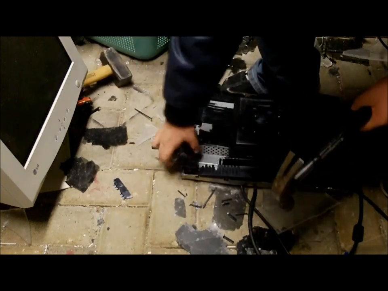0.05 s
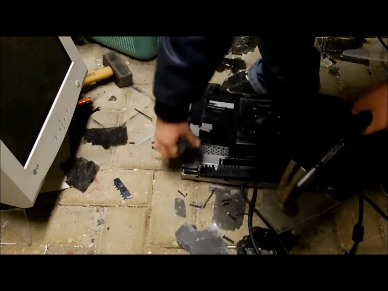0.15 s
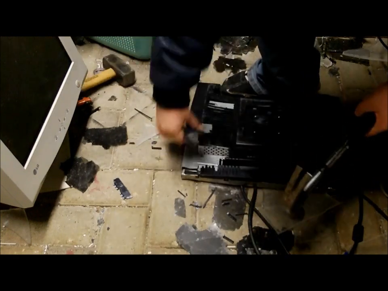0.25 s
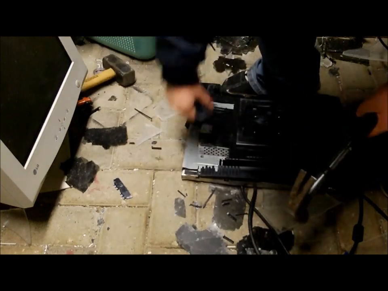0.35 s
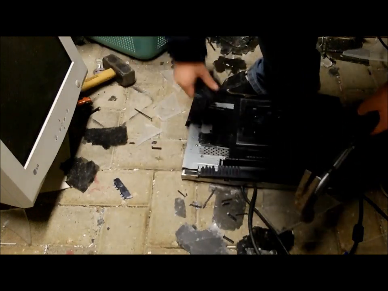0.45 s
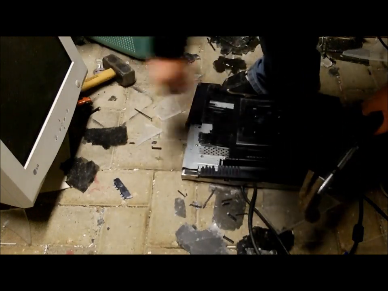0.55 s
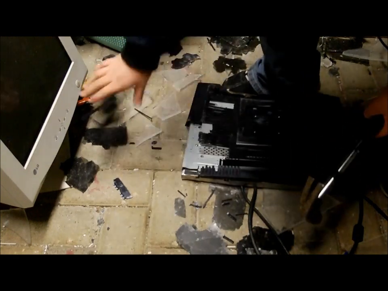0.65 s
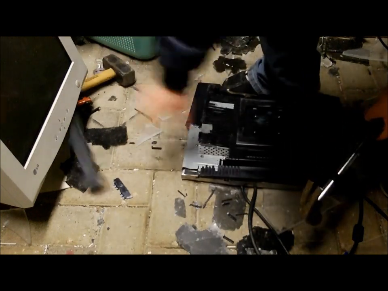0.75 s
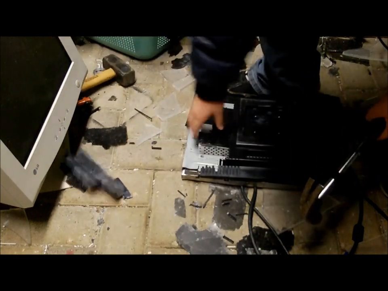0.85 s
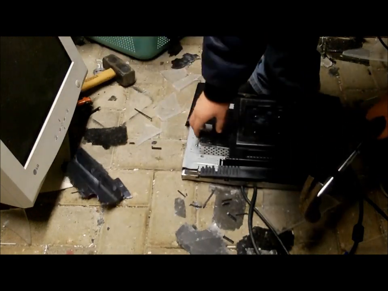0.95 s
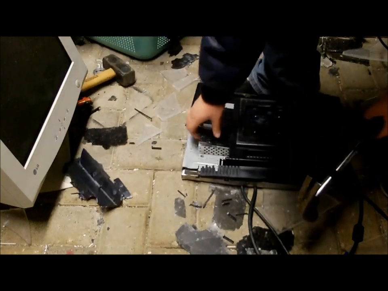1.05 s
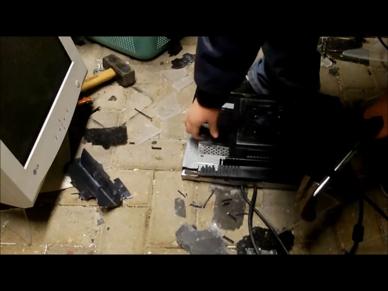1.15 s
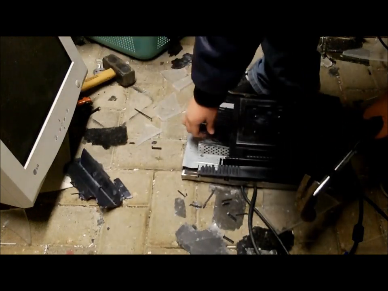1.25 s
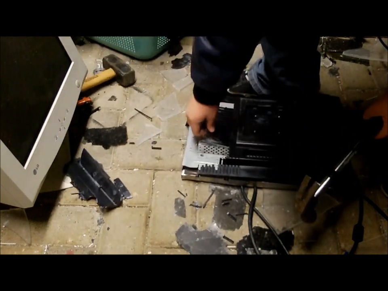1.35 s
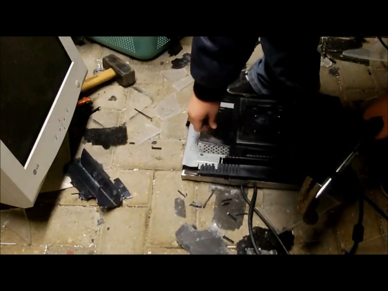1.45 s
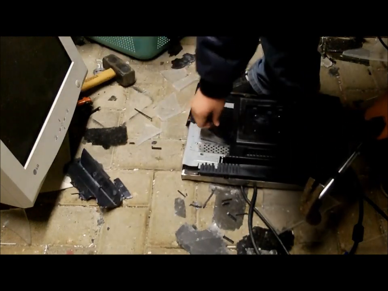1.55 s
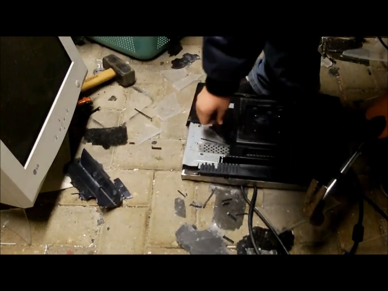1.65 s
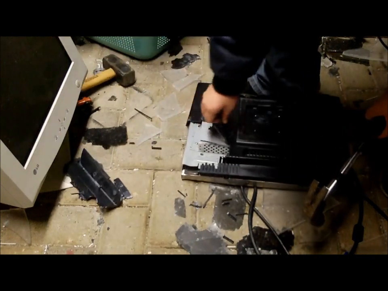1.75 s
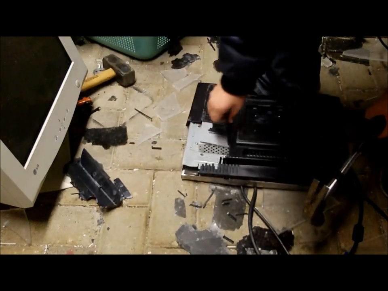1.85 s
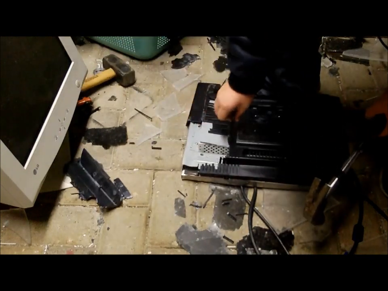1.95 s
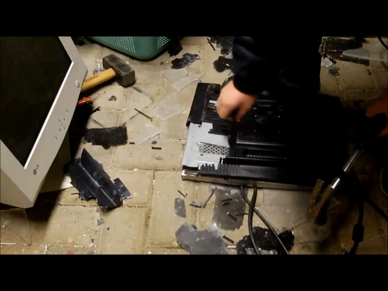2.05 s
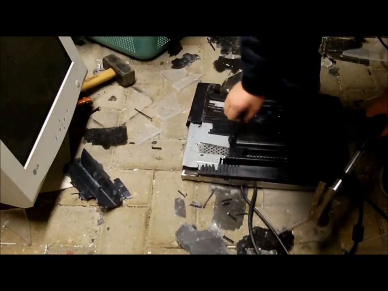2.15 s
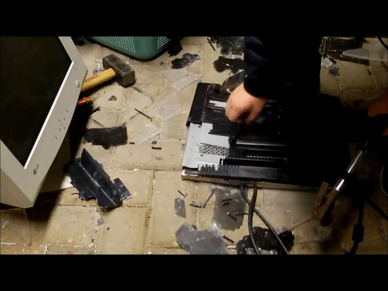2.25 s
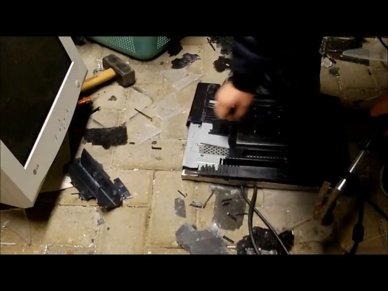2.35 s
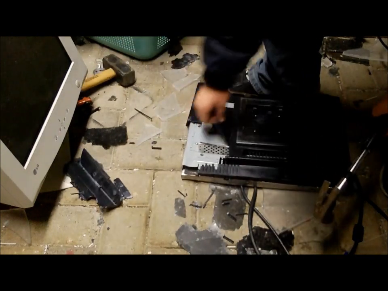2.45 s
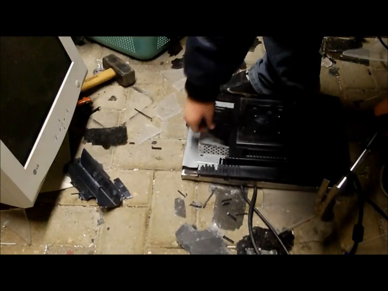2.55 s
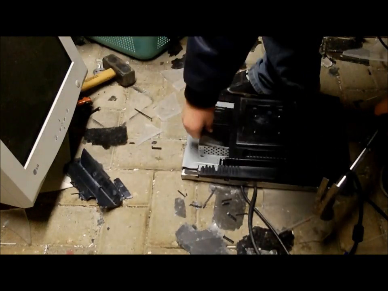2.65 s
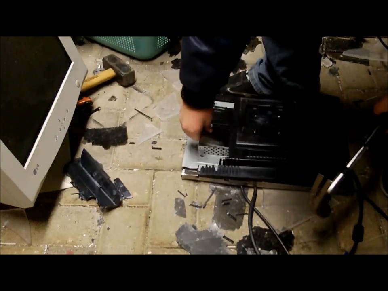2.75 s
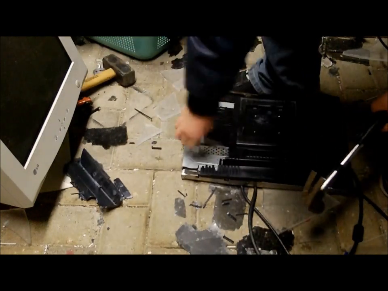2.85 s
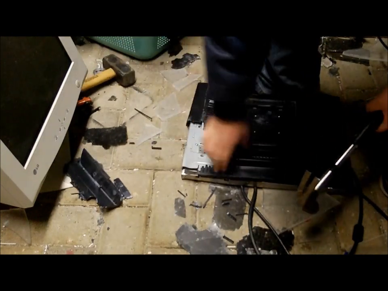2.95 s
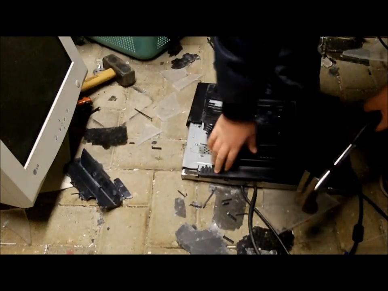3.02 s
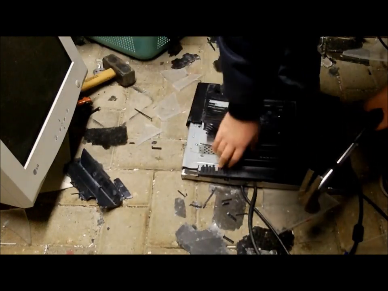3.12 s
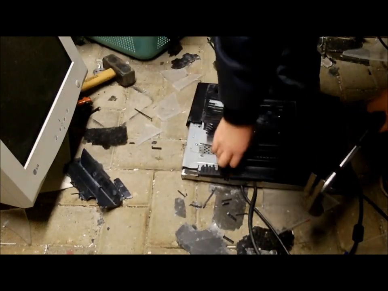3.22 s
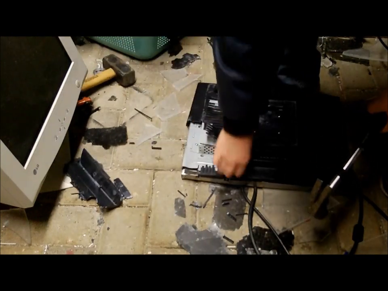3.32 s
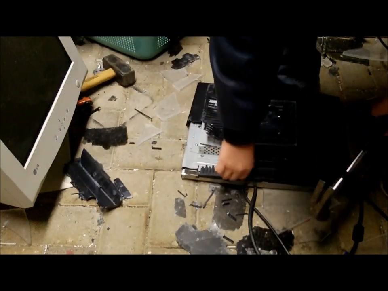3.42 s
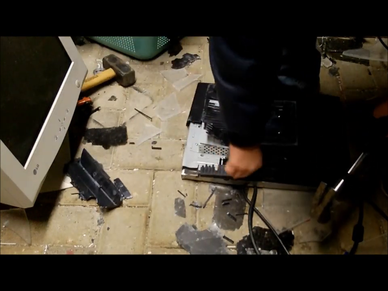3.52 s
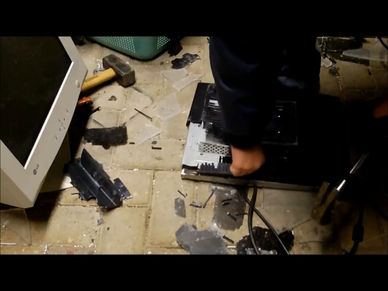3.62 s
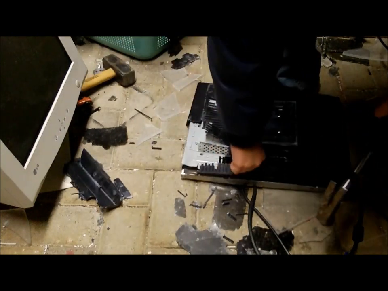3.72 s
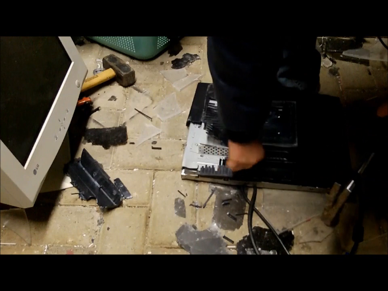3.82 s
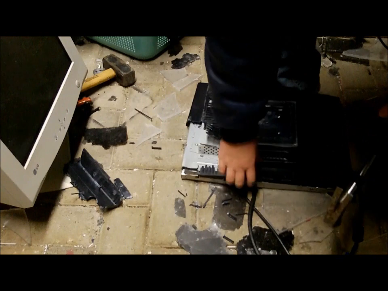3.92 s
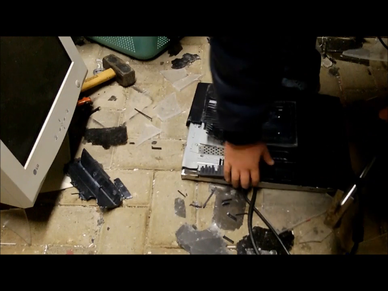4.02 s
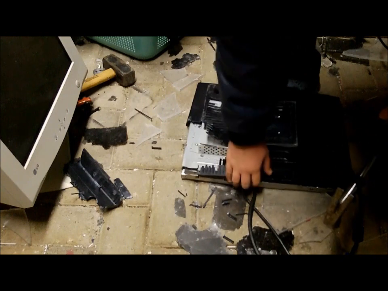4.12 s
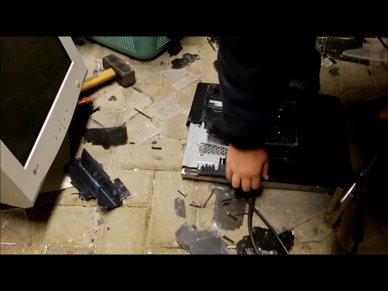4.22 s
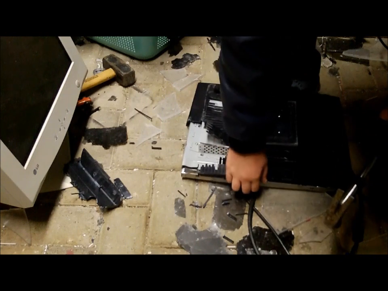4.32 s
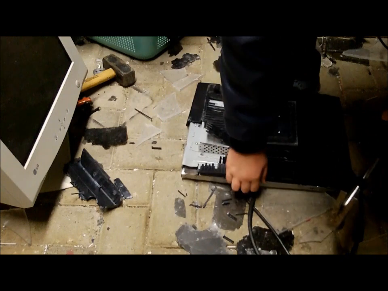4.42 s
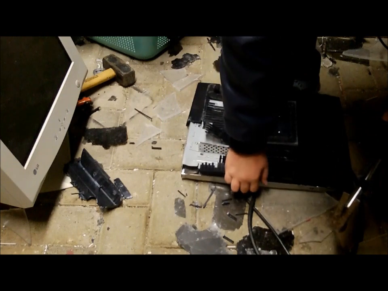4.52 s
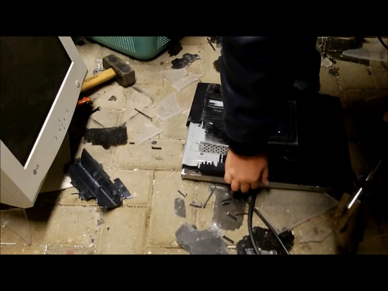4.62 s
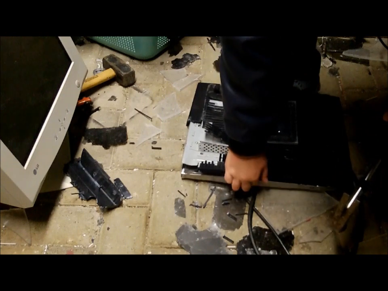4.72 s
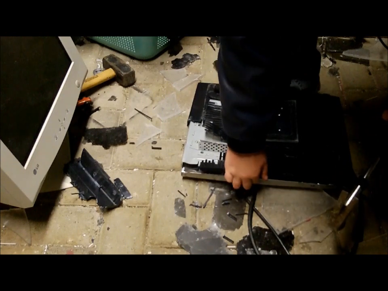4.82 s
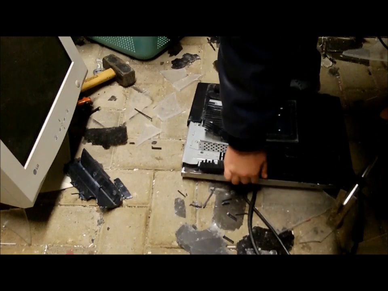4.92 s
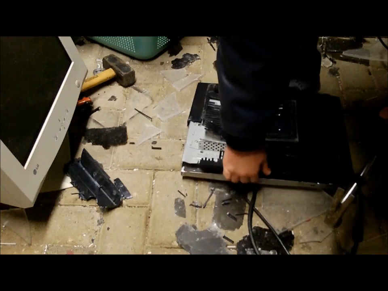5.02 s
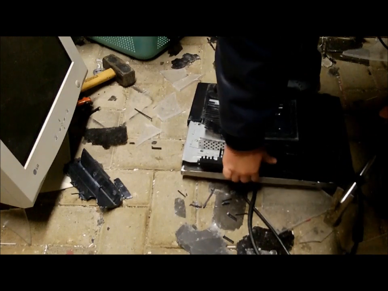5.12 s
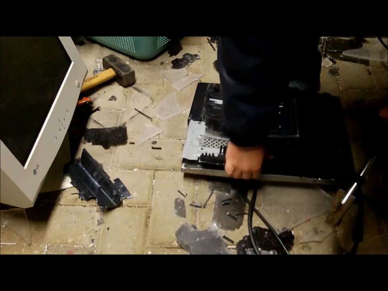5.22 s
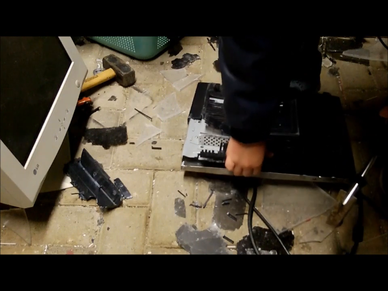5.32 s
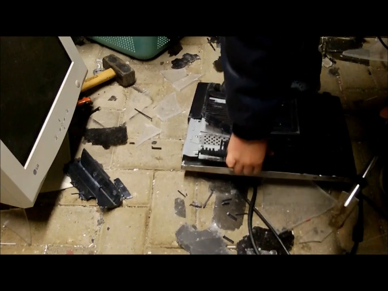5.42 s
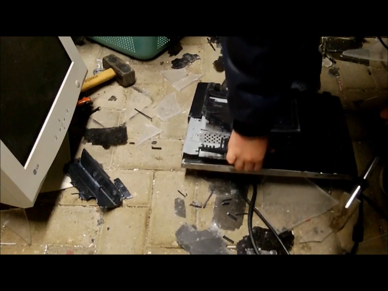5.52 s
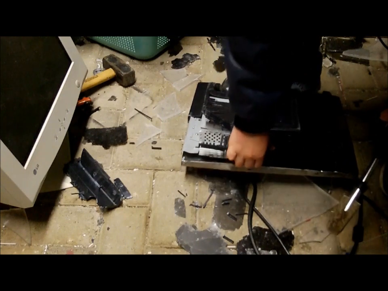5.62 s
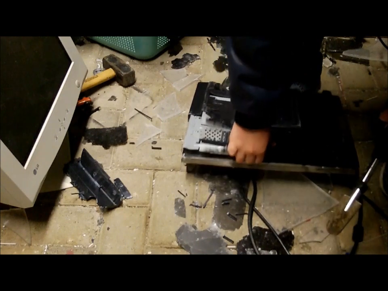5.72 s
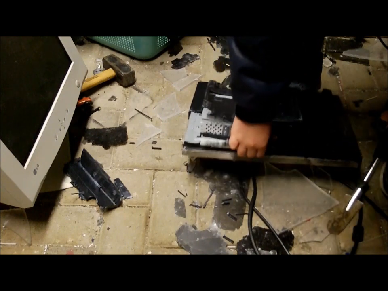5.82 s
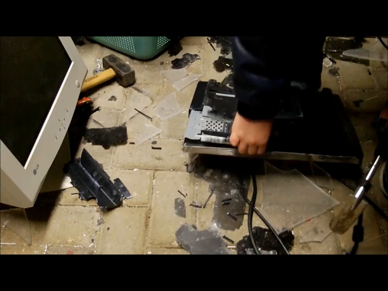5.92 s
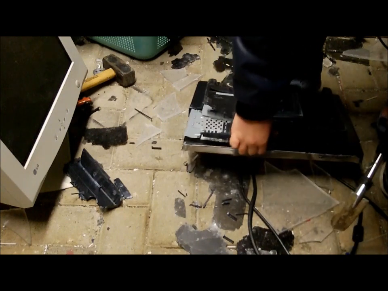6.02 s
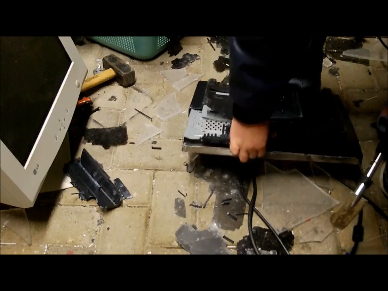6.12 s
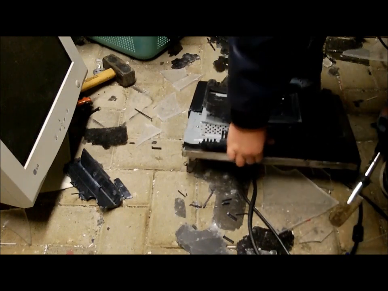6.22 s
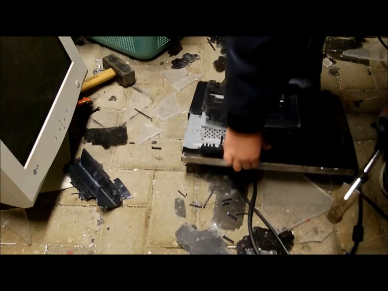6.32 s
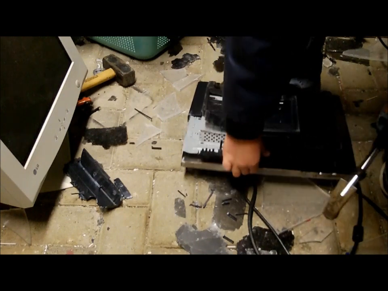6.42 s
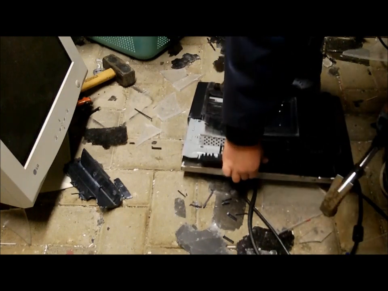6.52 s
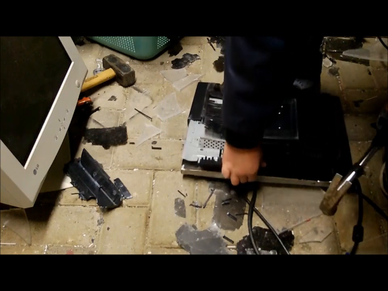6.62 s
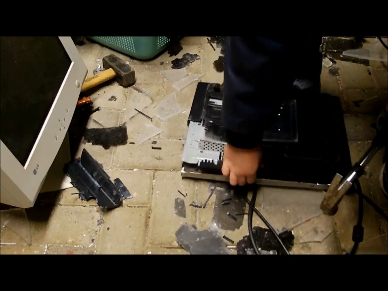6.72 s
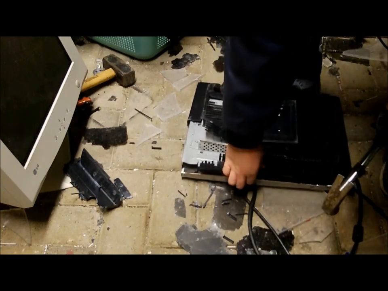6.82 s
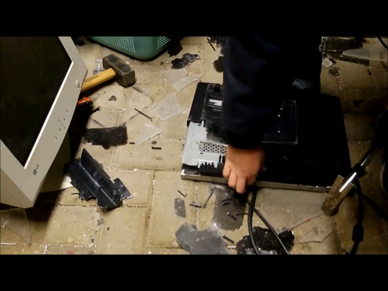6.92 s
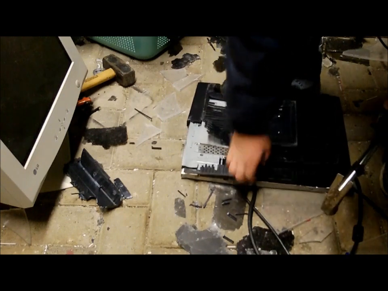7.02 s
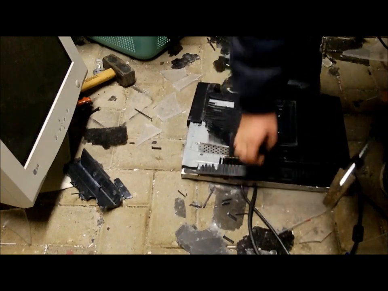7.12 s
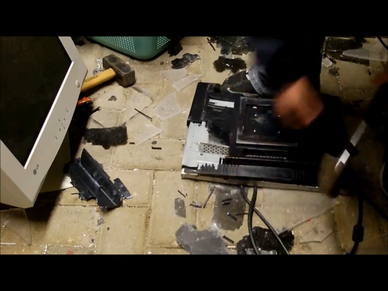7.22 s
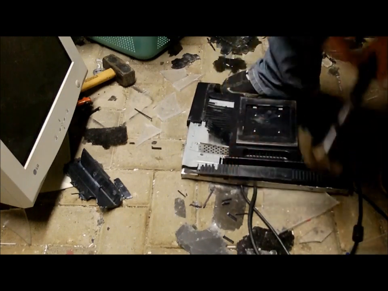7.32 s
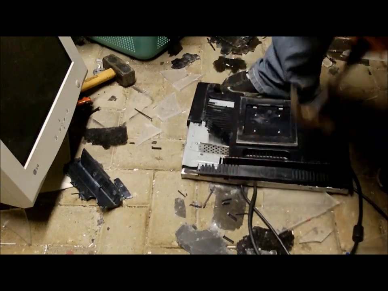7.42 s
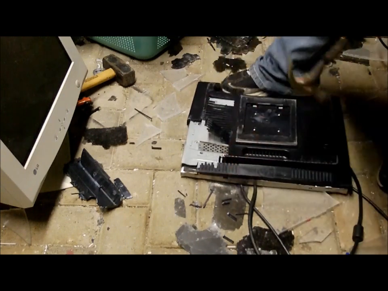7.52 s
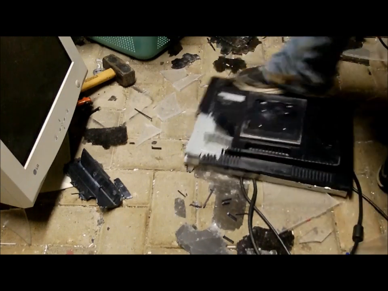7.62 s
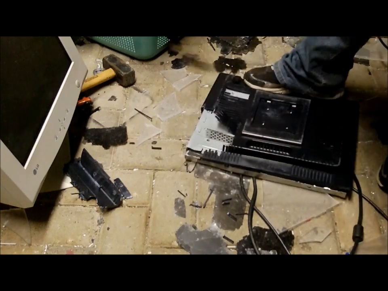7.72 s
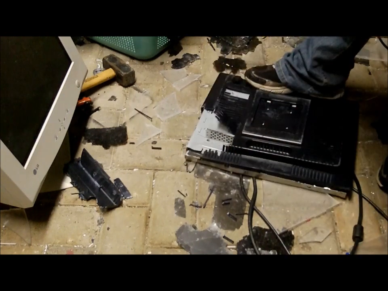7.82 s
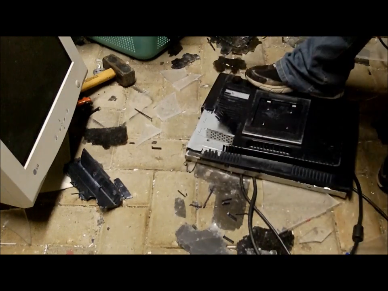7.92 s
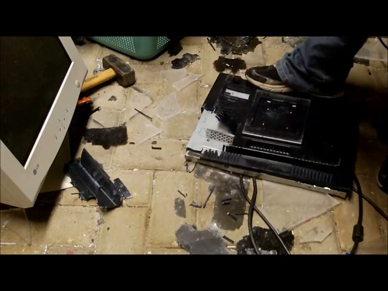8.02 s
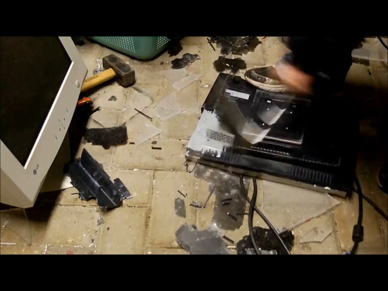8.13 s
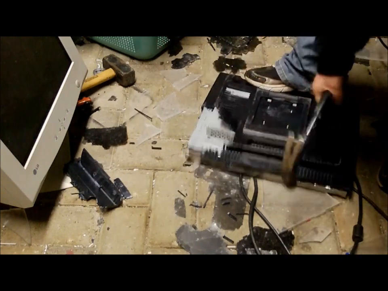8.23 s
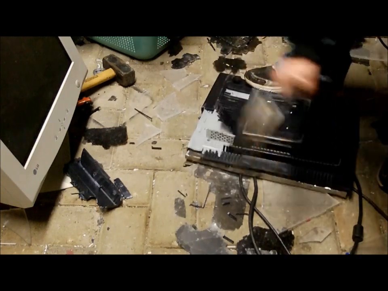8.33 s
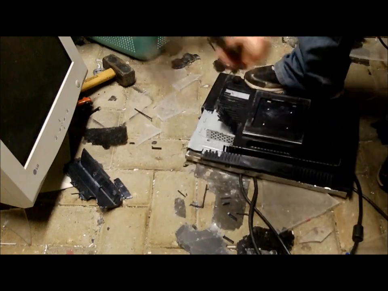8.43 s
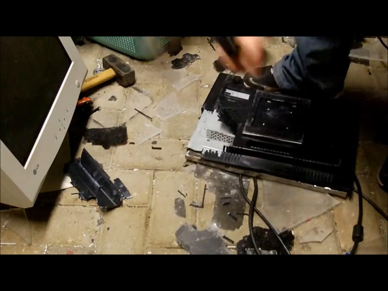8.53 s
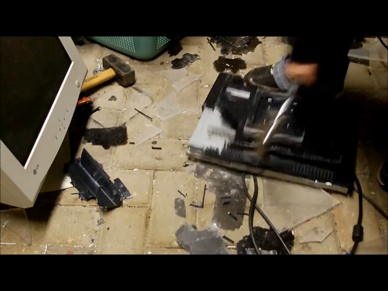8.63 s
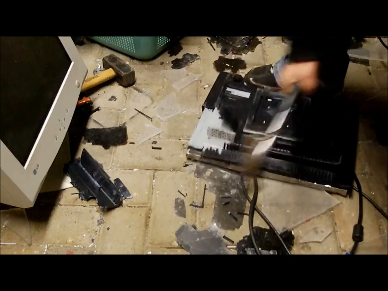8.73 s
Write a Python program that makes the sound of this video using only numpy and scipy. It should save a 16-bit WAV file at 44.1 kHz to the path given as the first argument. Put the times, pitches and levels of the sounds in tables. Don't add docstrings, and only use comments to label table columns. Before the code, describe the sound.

In a small hard-walled workshop, very close, plastic and metal are torn from a broken monitor with a sharp crunch, and scraps clatter and ring on tile. Two crisp plastic rips follow, then quiet ticks and crumbs, a panel crack, a loud frame drop, a rattling drag, and two shattering hammer blows. The microphone overloads on the loudest hits.

```python
import sys
import numpy as np
from scipy import signal
from scipy.fft import rfft, irfft, next_fast_len
from scipy.io import wavfile
from scipy.ndimage import uniform_filter1d

SR = 44100
rng = np.random.default_rng(int(sys.argv[2]) if len(sys.argv) > 2 else 0)


def file_out(sig):
    cols = np.atleast_2d(sig).T
    lim = np.clip(cols, -1, 1)
    pcm = np.round(lim * 32767).astype(np.int16)
    wavfile.write(sys.argv[1], SR, pcm)


def elevation(decibels):
    levels = np.asarray(decibels, float)
    return 10 ** (levels / 20)


N = 386316


def read(points, hz):
    f, value = np.transpose(points)
    return np.interp(np.log(hz + 1), np.log(f + 1), value)


def evened(x):
    return x / np.sqrt(np.mean(x ** 2) + 1e-20)


def coloured(x, gain):
    size = next_fast_len(x.shape[-1])
    spectrum = rfft(x, size) * gain(np.fft.rfftfreq(size, 1 / SR))
    return irfft(spectrum, size)[..., :x.shape[-1]]


def add(mix, start_s, sound):
    part = mix[..., max(round(start_s * SR), 0):][..., :sound.shape[-1]]
    part += sound[..., :part.shape[-1]]


def spell(start_s, length_s, db):
    edge_share = 0.13
    u = (np.arange(N) / SR - start_s) / length_s
    return elevation(db) * np.clip(np.minimum(u, 1 - u) / edge_share, 0, 1)


# f/Hz, level/dB
AIR = [(27, 3.5), (50, 1), (100, -8), (200, -17.5), (500, -17.5), (1000, -22.5), (2500, -28.5),
       (6000, -26.5), (10000, -26.5), (15000, -30.5)]
# t/s, length/s, level/dB
RUMBLE = [
    (4.202, 0.7, -40.5),
    (5.0, 1.67, -48),
]
# t/s, length/s, f/Hz, level/dB
HUM = [(4.6, .4, 132, -43.5), (4.65, .32, 200.6, -48.5), (5.015, 0.4, 199.6, -46), (5.5, 1.35, 200.6, -53),
       (5.2, .8, 145, -54), (4.26, 0.76, 312, -52.5), (6.0, .6, 307, -55.5), (6.75, .4, 303, -52),
       (7.7, 0.64, 305, -58)]


def air():
    air_db = -43.5
    drift = uniform_filter1d(uniform_filter1d(rng.standard_normal(N), 5000), 5000)
    hiss = evened(coloured(rng.standard_normal(N), lambda hz: elevation(read(AIR, hz))))
    tone = elevation(air_db) * elevation(2.0 * evened(drift)) * hiss
    rumble = evened(coloured(rng.standard_normal(N), lambda hz: hz / (1 + (hz / 70) ** 4)))
    tone += elevation(-4) * sum(spell(*row) for row in RUMBLE) * rumble
    machine_s = np.cumsum(1 + 0.013 * evened(uniform_filter1d(rng.standard_normal(N), 6000))) / SR
    for start_s, length_s, hz, db in HUM:
        tone += spell(start_s, length_s, db - 1.5) * np.sin(2 * np.pi * hz * machine_s)
    return tone


# f/Hz, t60/s
WALLS = [(100, 0.48), (500, 0.29), (2000, 0.37), (5000, 0.35), (12000, 0.28)]


def workshop(moving, still):
    count, spacing, turn_samples = 4, 10, 200
    taps = np.zeros((count, SR))
    slots = np.arange(60, SR - 10, spacing)
    at = slots + rng.integers(0, spacing, (count, len(slots)))
    np.put_along_axis(taps, at, rng.choice([-1., 1.], at.shape), 1)
    hz, t, z = signal.stft(taps, SR, nperseg=256)
    decay = elevation(-60 * t / read(WALLS, hz)[:, None])
    tails = signal.istft(z * decay, SR, nperseg=256)[1]
    tails = tails[:, :SR // 2] / np.linalg.norm(tails[0])
    which = np.arange(count)[:, None]
    turn = (np.arange(N) / turn_samples - which) % count - 1
    shares = np.cos(np.pi / 2 * np.clip(turn, -1, 1))
    sends = moving * shares + still * (which == 0)
    return signal.oaconvolve(sends, tails, axes=1).sum(0)[:N]


# f/Hz, level/dB
CRACK = [(30, -8), (120, -6.5), (300, -9), (600, 0), (2000, -6.5), (4500, -7.5), (7500, -6.5),
         (11000, -10.5), (16000, -26)]
SHADES = (650, 1900, 4500, 11500)


def shade_gains(hz):
    weights = [read(np.c_[SHADES, row], hz) for row in np.eye(len(SHADES))]
    gains = elevation(read(CRACK, hz)) * np.array(weights)
    return gains / np.sqrt(np.mean(gains ** 2, axis=1, keepdims=True))


def shades(x):
    return np.array([evened(part) for part in coloured(x, shade_gains)])


# f/Hz, width/Hz, level/dB
FRAME = [(400, 140, -0.5), (588, 32, -4.5), (663, 14, 5), (838, 28, 1.5), (1200, 85, -2.5), (1770, 200, -4),
         (2440, 37, -13.5)]
# t start/s, t peak/s, hold/s, level/dB, fall/(dB/s)
TUMBLES = [
    (.02, .32, 0.021, -9, 288),
    (.69, .7, .02, -12, 75.5),
]
FUMBLES = [
    (1.3, 1.45, .02, -43, 80),
    (4.2, 4.49, .6, -46.5, 300),
    (5.7, 5.9, 0.16, -44, 59.7),
]
DRAGS = [
    (6.97, 7.03, .003, -8, 430),
    (7.42, 7.5, .04, -29, 300),
    (7.53, 7.61, 0.037, -5, 500),
]
SKIDS = [
    (7.24, 7.36, 0.0079, -26, 160),
    (7.9, 7.93, 0.19, -46.5, 895),
]
SHATTERS = [
    (8.134, 8.136, .132, -1, 210),
    (8.3, 8.33, .01, -21, 130),
    (8.607, 8.609, .2, -0.5, 200),
]
# strokes, boom/dB, sizzle/dB
SHAKEN = [(TUMBLES, -7.5, -8), (FUMBLES, -5.5, 1.9), (DRAGS, -3.5, -2), (SKIDS, -15.5, 0.97), (SHATTERS, -7.5, -1)]


def rattle():
    ticks_per_s, rise_db = 2500, 23.5
    grit = elevation(4.5 * np.minimum(rng.exponential(1, N), 4)) * (rng.random(N) < ticks_per_s / SR)
    grit *= rng.choice([-1, 1], N)

    def frame(hz):
        return 1 + 0.91 * sum(elevation(db) / (1 + 2j * (hz - f) / width) for f, width, db in FRAME)

    parts = shades(coloured(grit, frame))
    out, t = np.zeros(N), np.arange(N) / SR
    for strokes, boom_db, sizzle_db in SHAKEN:
        power = np.zeros(N)
        for start_s, peak_s, hold_s, db, fall_db_per_s in strokes:
            swell_db = rise_db * np.maximum(peak_s - t, 0) / (peak_s - start_s)
            fall_db = fall_db_per_s * np.maximum(t - peak_s - hold_s, 0)
            power += (t >= start_s) * elevation(2 * (db - swell_db - fall_db))
        mixed = elevation(-9.5 + np.array([boom_db, -6.5, -3, sizzle_db])) @ parts
        out += np.sqrt(power) * mixed
    return out


def ring(hz, db, t60_s, split_share):
    rise_s = 0.0025
    t = np.arange(SR // 2) / SR
    fade = elevation(-60 * t / np.clip(0.5 * t60_s, .02, .42)) * np.minimum(t / rise_s, 1)
    main = np.sin(2 * np.pi * hz * t)
    split = np.sin(2 * np.pi * hz * 1.021 * t) + 0.93 * np.sin(2 * np.pi * hz * 0.86 * t)
    return elevation(db + 18) * (main + split_share * split) * fade / np.linalg.norm(fade)


# f/Hz, level/dB, t60/s
FLOOR = [(69.7, -3, .65), (137.7, 0.9, 0.26), (290, 2.5, .4)]
SCRAP = [(385, -13.5, 0.94), (787, -2.5, 0.504), (888, -1.2, 0.28), (1262, -11.5, 0.49), (1450, 1, .16),
         (1817, 1.5, 0.21), (1900, 0.5, 0.24), (2110, 4, 0.22), (2370, -8, 0.33), (2850, -10.5, .1),
         (3200, -1.5, .05), (3494, 0, 0.094), (3647, 3.5, 0.21), (3930, -4, 0.13)]
CHASSIS = [(214, -17, .2), (400, -2, 0.222), (474, -1.5, .2), (537, 1, 0.18), (655, -13, .22),
           (752, 2.5, 0.14), (817, -4, 0.15), (904, -6.5, .18), (973, -3, 0.17), (1236, -0.9, 0.15),
           (1426, -7.5, .2), (1808, 3.5, 0.067), (1950, -7, .13), (3580, -10, .2)]
PANEL = [(715, -3, 0.24), (1200, 0, .3), (1400, -4.5, 0.27), (1740, -1, .25), (1943, -1.5, .3),
         (2120, -6, .2), (2450, -10, .25), (3644, -13, .15), (4129, -12, .2), (5281, -16, .2)]
# t/s, level/dB, centre f/Hz and spread/octaves of the woken modes
FLOOR_HITS = [
    (.002, -18.5, 221, .8),
    (.182, -20.5, 130, 0.66),
    (5.601, -25, 140, 0.45),
    (6.913, -25.5, 90, .5),
    (8.136, -17, 99.3, 0.92),
    (8.608, -20.5, 99.6, .8),
]
SCRAP_HITS = [(.127, -28.5, 2000, 0.65), (.286, 0.1, 2050, 0.28), (.287, -1, 3500, 0.13),
              (.701, -4, 3300, .3), (.7, -0.5, 982, 0.18), (.765, -2.5, 780, 0.16), (.79, -6, 800, 0.41),
              (.766, -1, 3480, 0.11), (.906, -8, 3300, 0.39), (0.992, -2, 3000, 0.2), (0.992, -4, 385, .3)]
CHASSIS_HITS = [(2.653, -26, 1900, 0.26), (7.575, -11.5, 1100, .25), (7.605, -7, 1100, .25),
                (7.64, -7, 1000, .3), (8.18, -7, 720, .2), (8.23, -7, 720, 0.19), (7.03, -9.5, 750, .3),
                (7.625, -8, 750, .25), (7.645, -6, 600, .2), (7.67, -8, 600, .2),
                (3.306, -21.5, 1000, 0.37), (3.771, -19.5, 546, 0.44), (3.875, -21, 1270, 0.54),
                (4.748, -25, 1200, 0.091), (5.455, -14.5, 642, 0.22), (5.601, -14.5, 735, 1),
                (6.706, -38, 520, 0.22), (6.915, -3, 1300, 0.13), (6.917, 0.5, 655, 0.036),
                (7.011, -9.5, 604, 0.28), (7.793, -9.5, 865, 0.14)]
PANEL_HITS = [
    (5.193, -9, 1340, 0.54),
    (5.21, -14, 1300, .5),
    (6.915, -7, 1740, .3),
    (6.944, -11, 1700, .3),
    (2.828, -24, 2100, 0.27),
    (0.00204, -15, 800, .5),
]
# t/s, level/dB, f/Hz, t60/s
CHIPS = [(.991, -8, 2400, 0.1), (0.82, -14, 3817, .2), (.907, -9, 4780, .06), (.907, -10, 2500, .15),
         (.992, -13, 4600, .3), (1.028, -10, 3700, .08), (.992, -12.5, 4720, .1), (0.86, -16, 1217, .29),
         (1.865, -14, 1200, .12), (1.731, -20.5, 780, .4), (2.653, -28, 794, .29), (2.653, -34, 2700, .9),
         (2.12, -14, 4900, .08), (2.122, -13, 4450, .2), (2.13, -23, 1026, .5), (1.87, -13, 1800, .1),
         (4.45, -30.5, 1900, .08), (4.615, -27, 2510, .07), (4.868, -23.5, 2900, 0.16),
         (4.868, -26, 3400, .06), (4.97, -31, 1250, 0.34), (2.654, -27, 1870, .06), (2.654, -27, 3000, .06),
         (4.869, -23, 4900, 0.06)]
# t/s, level/dB, f/Hz, t60/s
SHELL = [(1.732, -9.5, 399, .62), (.991, 1.5, 2374, .7), (.991, -3.5, 2390, .5), (.991, -5, 2300, .2),
         (.25, -6, 1879, .7), (.288, -4, 1879, .6), (.295, -1, 2120, .6), (.294, -1, 3526, .5),
         (.31, -7, 1448, .5), (.318, -2, 1900, .5), (.325, -5, 3560, .5), (.132, -14, 1290, .7),
         (.13, -26, 3100, .4), (6.915, -1.5, 1880, .25), (6.916, -6, 1600, .2), (6.915, -5, 1280, .25),
         (6.945, -5, 1900, .25), (6.945, -9, 1440, .3), (6.915, -8, 3700, .2), (5.193, -11, 716, .3),
         (5.193, -8, 1200, .45), (5.193, -10, 1739, .25), (5.193, -9, 1970, .4), (5.193, -15, 4200, .15),
         (5.193, -17, 5300, .12), (2.828, -22, 2050, .3), (2.828, -23, 2420, .2), (2.828, -31, 1160, .25),
         (.907, -13, 3817, .4), (.7, -7, 950, .2), (7.625, -8, 680, .3), (7.65, -8, 680, .2),
         (8.2, -6, 680, .4), (8.26, -6, 690, .3)]


def rings():
    cracked, whole = 0.61, 0.3
    bodies, chips, shell = np.zeros((3, N))
    struck = ((FLOOR, FLOOR_HITS), (SCRAP, SCRAP_HITS), (CHASSIS, CHASSIS_HITS), (PANEL, PANEL_HITS))
    for modes, hits in struck:
        sounds = np.array([ring(*mode, cracked) for mode in modes])
        modes_hz = np.array(modes)[:, 0]
        for start_s, db, centre_hz, octaves in hits:
            woken = np.exp(-.5 * (np.log2(modes_hz / centre_hz) / octaves) ** 2)
            add(bodies, start_s, elevation(db) * woken @ sounds)
    for start_s, db, hz, t60_s in CHIPS:
        add(chips, start_s, ring(hz, db, t60_s, whole))
    for start_s, db, hz, t60_s in SHELL:
        add(shell, start_s, ring(hz, db, t60_s, 0))
    return bodies, chips, shell


# t/s, level/dB, body boom/dB, brightness/dB
CRUNCHES = [
    (0.1297, -15, -1.5, -22),
    (0.2844, 0, -2, 7),
    (1.0296, -13.5, -4, -4),
    (3.284, -31, 5, 6),
    (3.7534, -26, 5, 4.5),
    (4.7497, -28.5, 3, 5.5),
    (7.014, -13.5, 6, 14.5),
    (7.022, -14, 7, 7.5),
    (8.6066, -1, -3.5, 3),
]
SMACKS = [(0.002, -6.5, 5, -3), (0.183, -5, -15, 10), (2.0825, -23, -10, 12), (3.3025, -24, 3, 1),
          (3.7709, -19.5, 1, 7.5), (4.5137, -26.5, 1, -5), (4.9673, -23.5, -4, 0.5),
          (5.4954, -22.5, -3, 1.5), (5.616, -30.5, -6, 13), (6.892, -34, 12.5, -8), (6.9143, -4, -14, 4),
          (6.944, -15, -11, -3), (7.1197, -31, -14, 22), (7.481, -28, 13, -27), (7.4944, -28, 14, -34),
          (7.598, -8, -5, 0.5), (7.612, -8, -5, 0), (1.869, -14.5, -3.5, 5), (8.12, -28.5, 3, -8),
          (8.1352, -2, 0, 8)]
CLANGS = [
    (0.6981, 3, -12.5, -1.5),
    (0.7642, 0.5, -3, -0.5),
    (0.9887, -10.5, -37, -8),
    (1.729, -21.5, 0, 2),
    (4.6128, -34, 7.5, 6.5),
    (4.8681, -25.5, -4, -2),
]
CRACKS = [
    (0.9075, -9.5, -15, -2.5),
    (0.991, -10.5, -25, -5),
    (5.192, -12, 2, -4),
    (1.028, -18.5, -15, -2.5),
    (2.119, -15.5, -15, 5),
]
SNAPS = [(0.169, -18, 6.5, -30.5), (0.246, -11, -14.5, 17), (1.042, -35.5, -16, 8),
         (1.722, -30.5, -23, -25), (2.456, -30, -2, -38), (2.6543, -24, 1, 10.5), (2.8278, -20, -1, 3),
         (3.8716, -21.5, 4.5, -1.5), (4.4488, -27.5, 6.5, 5.5), (4.765, -38, -9, 15),
         (4.781, -38, -9.5, 11.5), (7.362, -35.5, -16, 7), (5.1295, -29, -3, 1), (5.452, -28, 9.5, -4),
         (5.528, -23.5, 11.5, -0.5), (5.5417, -26.5, 9.5, -20), (5.874, -34.5, -14, 7.5),
         (0.8524, -15, -6, 15.5), (8.429, -28, -20, 21.5), (8.4763, -38, -11, 27)]
TICKS = [
    (.177, -14.5, 8.1, -32),
    (0.985, -32, 19.3, 13),
    (5.601, -13.5, 11.2, 4.5),
    (7.538, -10, 2, -10),
    (7.794, -19.5, 3.6, -5.5),
    (7.499, -24.5, 3, -12),
    (7.684, -15, 3, -5.5),
    (5.213, -19, 0.1, -5),
    (5.613, -19.5, 4, -0.5),
]
CRUMBS = [(.61, -47, -11, 12), (1.3362, -39, -21, 7), (1.4242, -36, 5, 6), (2.4317, -37.5, -11, 8),
          (2.53, -37, 4, 7.5), (2.789, -54, 18, 6), (3.054, -42, 6.5, -19), (3.493, -43, 14, -12),
          (3.5374, -51, 22, -2), (3.5622, -37.5, -12, 11), (3.592, -51, 23, -10), (3.7314, -39.5, 9, 8.5),
          (4.1111, -47.5, 15, -17), (4.1474, -40, -5, 2), (4.2153, -42.5, 12.5, -14),
          (4.3066, -43.5, 10, 4), (4.3572, -40, 9, -18), (4.4104, -37.5, 10.5, 3), (4.6982, -41, -18, -14),
          (6.0741, -37, 5, 6), (6.3662, -46, 4, 17.5), (6.7061, -43.5, 14, 9.5), (6.86, -35, -13.5, 0.5),
          (7.425, -42, 21, -30), (8.033, -43.5, -3, 10.5), (5.78, -50.5, -5, 13), (6.51, -55, -7.5, 18),
          (7.925, -44, 9, 10.5)]
RIPS = [
    (1.8412, -5, -4, 13.7),
    (2.1189, -8, -7.5, 17.3),
    (3.1267, -34, 8, 6.6),
]
# contacts, contact time/s, extra snap/dB
KINDS = [(CRUNCHES, 0.017, 0.1), (SMACKS, 0.01, 0.1), (CLANGS, 0.022, 6.1), (SNAPS, 0.0055, 0.1),
         (TICKS, 0.0036, 0.1), (CRUMBS, 0.011, -0.84), (RIPS, 0.016, -4), (CRACKS, 0.001, 9.5)]
CLEAN_SHARE = (1.01, 1.01, .75, 0.47)


def knocks():
    snap_share = 0.66
    force, ticks = np.zeros((2, len(SHADES), N))
    t = np.arange(SR // 4) / SR
    for rows, contact_s, snap_db in KINDS:
        clean = min(0.041 + 1.13 / (1 + (contact_s / 0.0039) ** 2), .98)
        clean = clean * np.clip(np.c_[list(CLEAN_SHARE)], 0, 1)
        crunch = np.exp(-t / contact_s) * np.minimum(t / 0.0003, 1)
        crunch /= np.linalg.norm(crunch)
        for start_s, db, boom_db, bright_db in rows:
            level = elevation(db + np.c_[[boom_db, 0, snap_db + snap_share * bright_db, bright_db]])
            add(force, start_s, level * np.sqrt(1 - clean) * crunch)
            add(ticks, start_s, level * np.sqrt(clean))

    def bending(hz):
        return np.exp(-2j * np.pi * 0.002515 * (hz - 2 / 3 * hz * np.sqrt(hz / 16000)))

    ticks = coloured(ticks, lambda hz: shade_gains(hz) * bending(hz))
    return elevation(14.0) * (ticks + force * shades(rng.standard_normal(N))).sum(0)


def scene():
    hits = coloured(knocks() + rattle(), lambda hz: (1j * hz / (1j * hz + 180)) ** 2)
    bodies, chips, shell = rings()
    wet = workshop(hits + elevation(-5.5) * bodies, elevation(-2.5) * chips)
    mono = elevation(-2.0) * hits + elevation(-1.5) * (bodies + chips) + shell + wet + air()
    return np.array([mono, mono])


def top_cut(x):
    return signal.sosfilt(signal.butter(12, 15990, fs=SR, output="sos"), x)


# f/Hz, side minus mid level/dB
SIDE_SHARE = [(60, -34), (150, -21.5), (380, -37), (1000, -33), (5500, -26.5), (7800, -21), (9500, -25),
              (15000, -25)]


def record(dry):
    shadow_hz, shadow_share, edge_hz = 7750, 0.92, 15950
    port = coloured(dry[0], lambda hz: 1 + shadow_share * np.exp(-1j * np.pi * hz / shadow_hz))
    mid = np.clip(port, -.95, .95)
    flicker = evened(uniform_filter1d(rng.standard_normal(N), size=600))
    side = flicker * coloured(mid, lambda hz: elevation(read(SIDE_SHARE, hz)))
    pair = coloured(np.array([mid + side, mid - side]), lambda hz: hz < edge_hz)
    mix = np.clip(pair, -1, 1)
    return top_cut(mix)


dry = scene()
out = record(dry)
file_out(out)
```